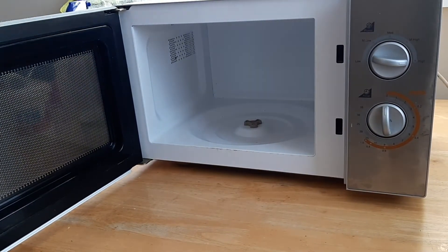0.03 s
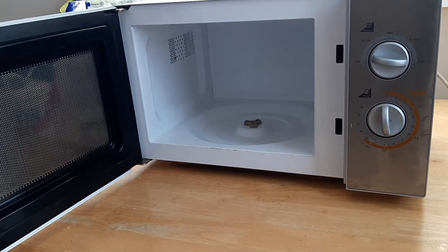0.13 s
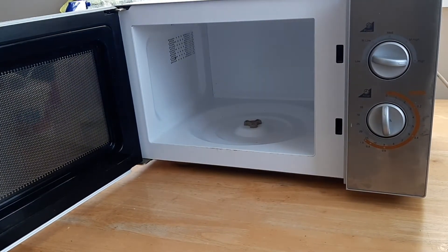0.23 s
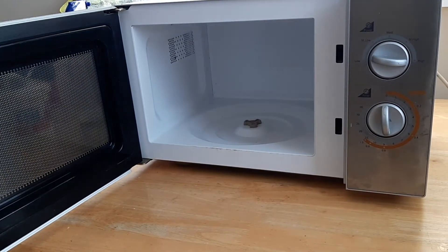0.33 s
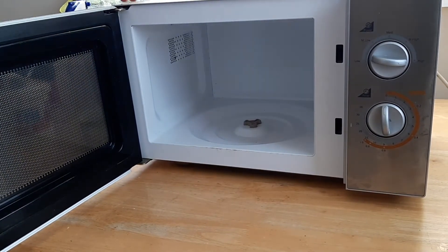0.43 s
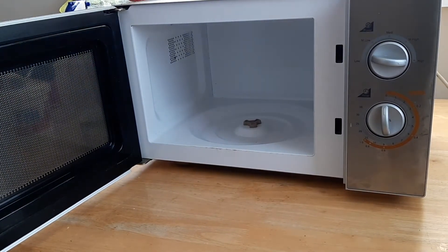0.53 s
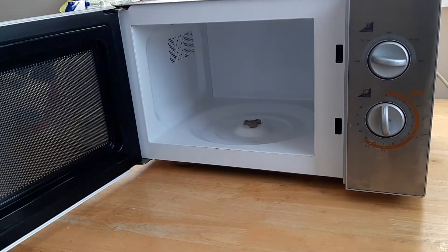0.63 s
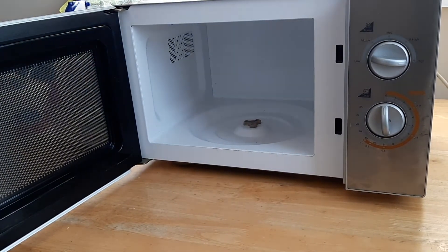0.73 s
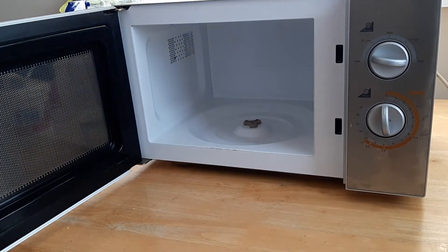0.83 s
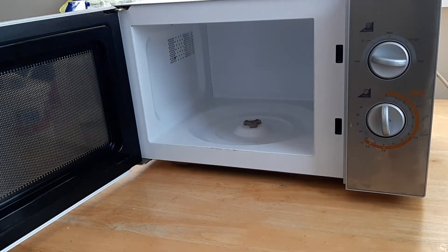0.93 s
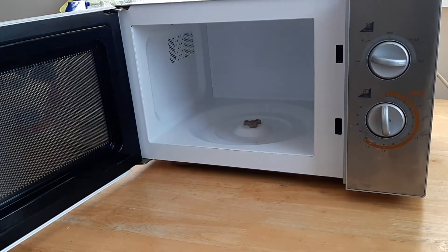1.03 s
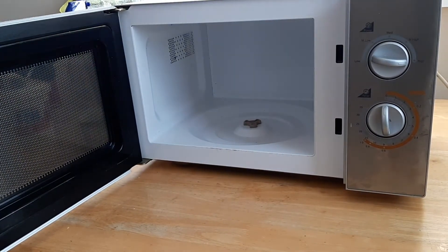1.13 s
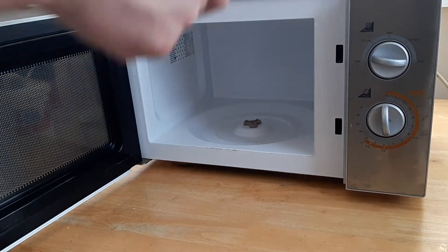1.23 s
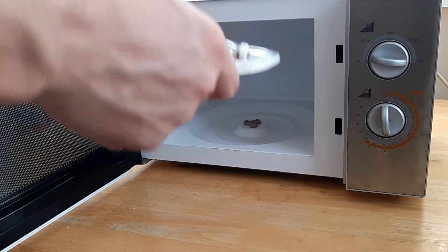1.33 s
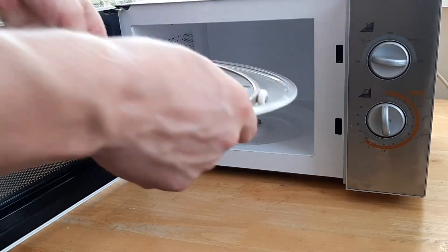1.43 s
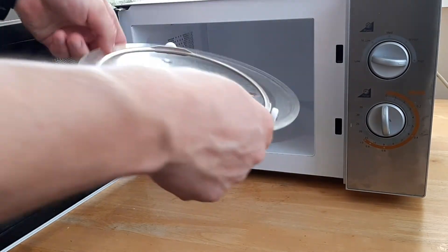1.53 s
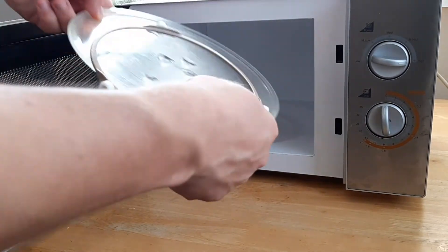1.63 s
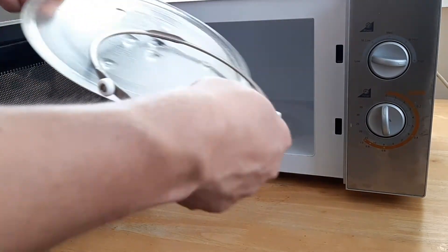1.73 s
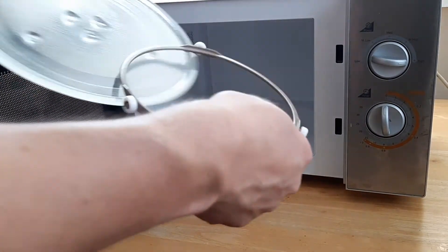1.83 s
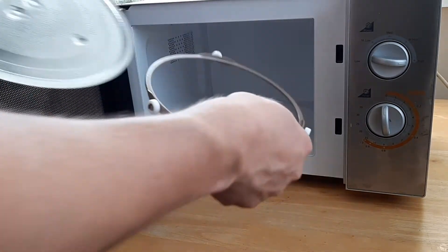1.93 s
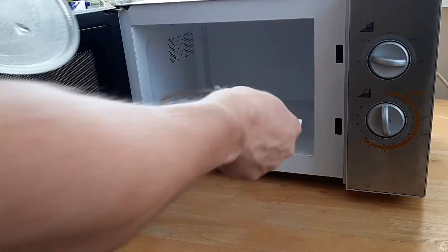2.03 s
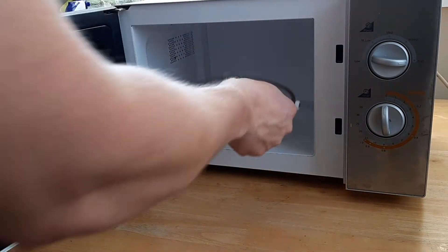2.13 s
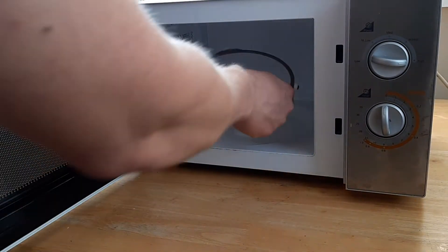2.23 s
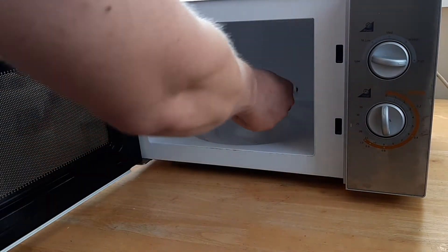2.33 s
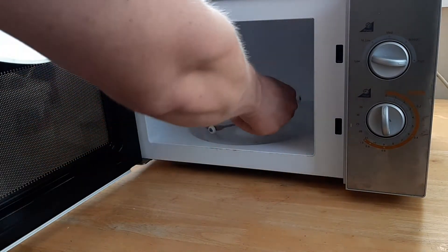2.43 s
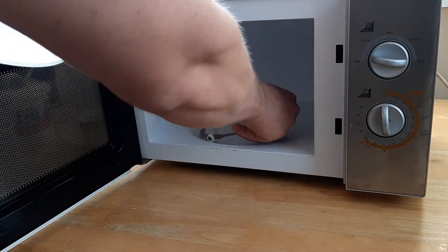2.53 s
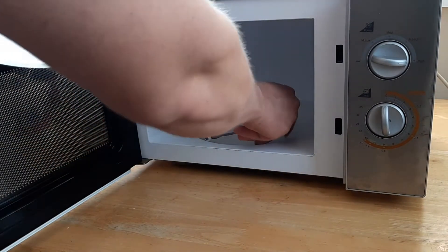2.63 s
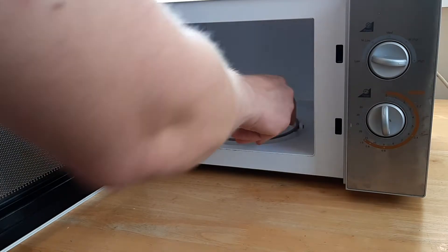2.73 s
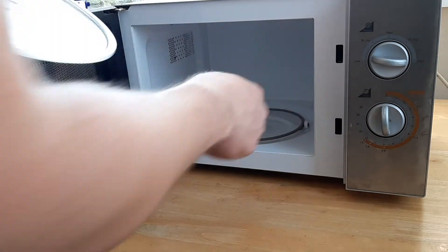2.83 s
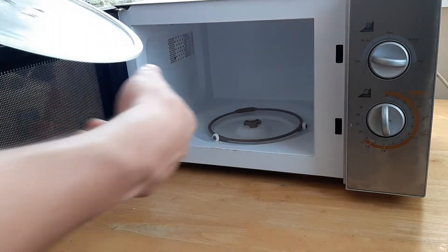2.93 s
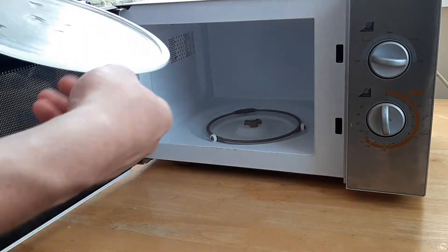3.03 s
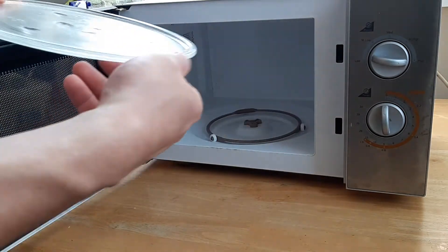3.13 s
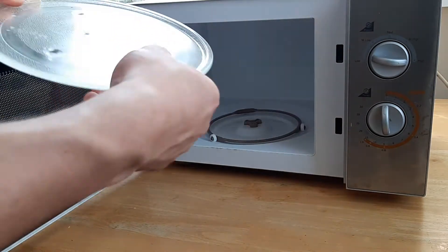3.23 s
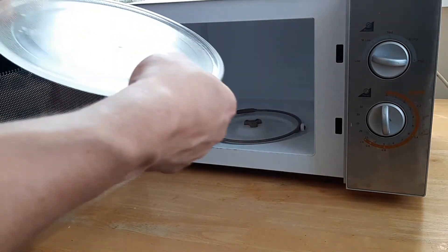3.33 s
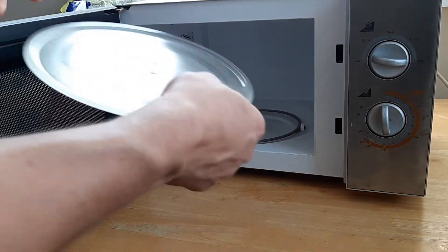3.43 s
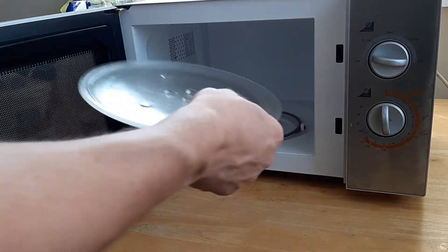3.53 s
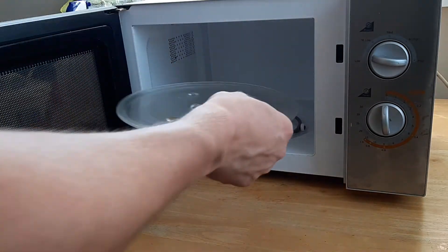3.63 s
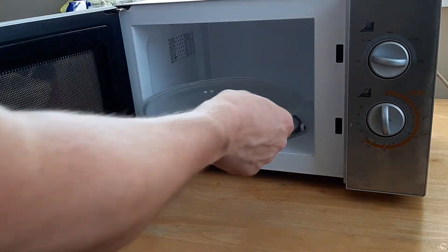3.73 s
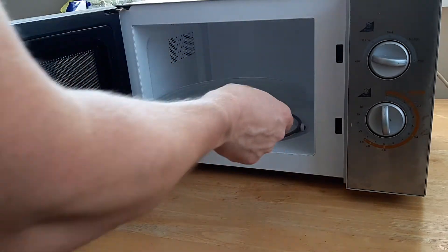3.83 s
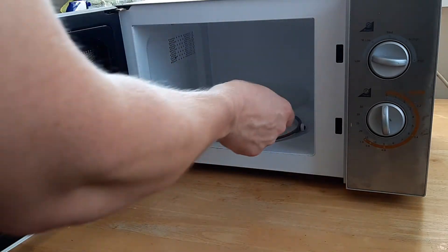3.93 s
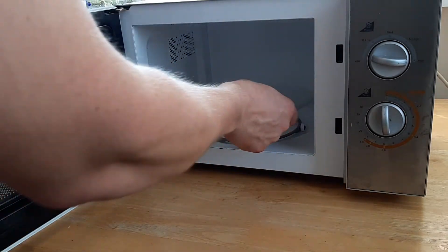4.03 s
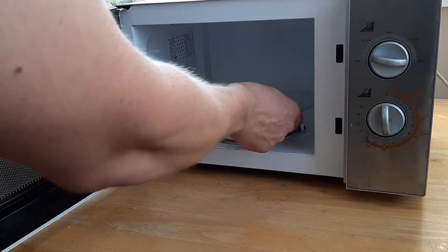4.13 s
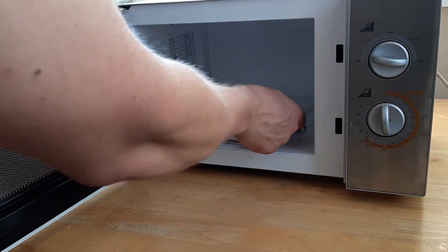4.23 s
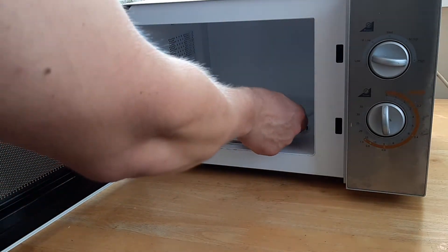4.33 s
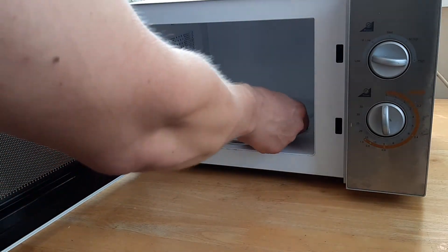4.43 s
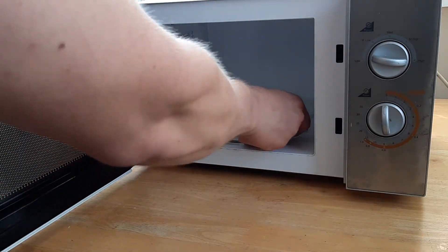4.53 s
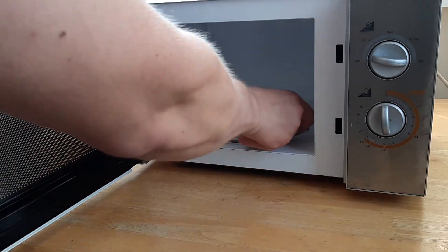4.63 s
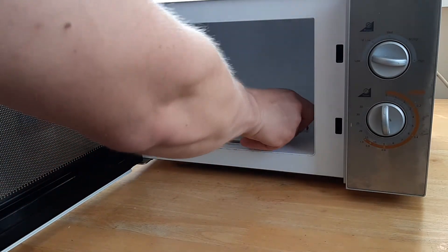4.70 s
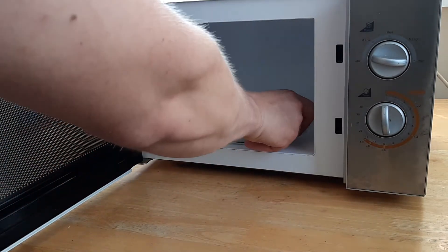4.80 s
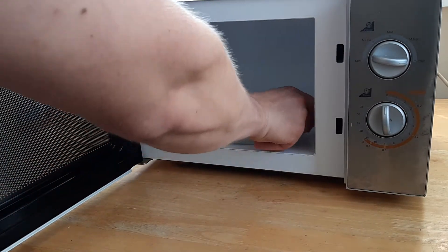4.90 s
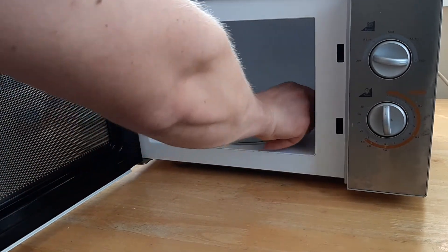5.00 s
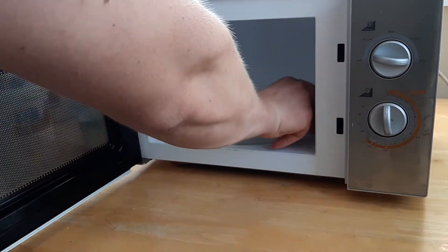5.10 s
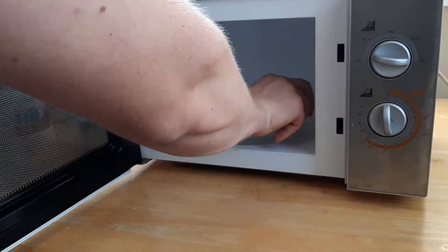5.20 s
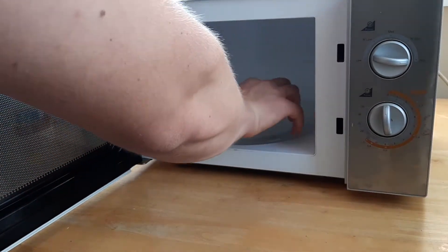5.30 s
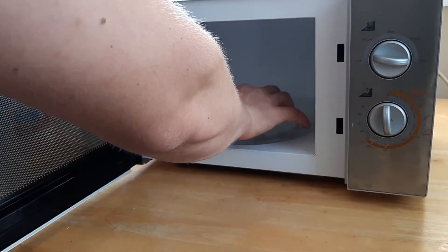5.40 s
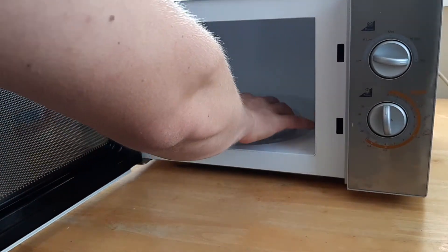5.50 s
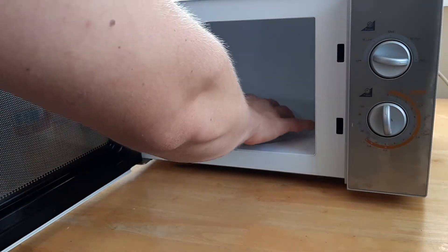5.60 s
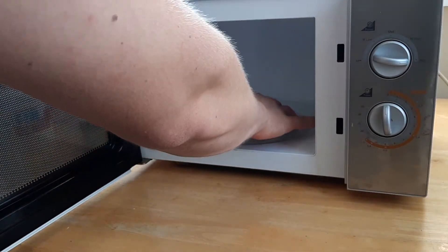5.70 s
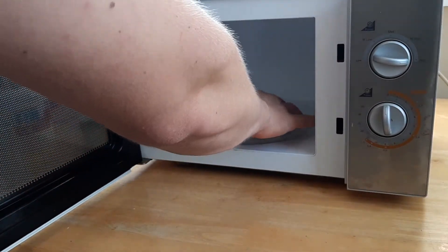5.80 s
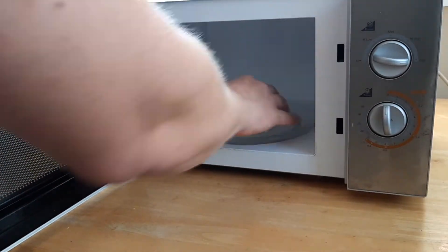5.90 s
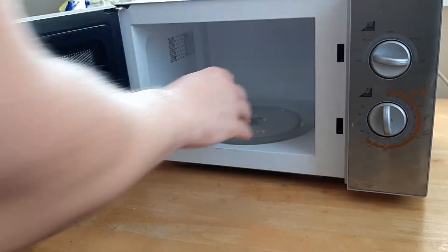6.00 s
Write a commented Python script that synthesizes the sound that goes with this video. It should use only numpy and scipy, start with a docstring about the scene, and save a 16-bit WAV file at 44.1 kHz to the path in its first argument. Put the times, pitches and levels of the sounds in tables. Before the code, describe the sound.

Close, hollow knocks and glassy clinks inside a metal oven cavity, then a loud plastic rattle and heavy plate bumps over faint hum and airy hiss.

```python
"""Glass plate in an open microwave oven

Small kitchen, two-port microphone, oven a little to the left: a glass turntable plate is picked up and clinks
on its roller ring. The plastic ring clatters onto the steel floor; the plate is set down, bumps softly as it is
turned and rocks, and drops onto the coupler with hollow knocks. Each contact rings sine modes and adds a noise
crack and a dense noise tail. Behind lie a rush of air (shaped noise) and a faint hum (wavering sine); gain
control ducks all after loud blows.
"""
import sys
import numpy as np
from scipy import signal
from scipy.fft import rfft, irfft, next_fast_len
from scipy.io import wavfile
from scipy.ndimage import uniform_filter1d, minimum_filter1d

SR = 44100
rng = np.random.default_rng(int(sys.argv[2]) if len(sys.argv) > 2 else 0)


def to_wav(sig):
    """Store sig (one row per channel, or 1-D mono) as 16-bit WAV at the path in sys.argv[1].

    Samples outside -1..1 are clipped; the rate is SR.
    """
    pcm = np.clip(np.atleast_2d(sig), -1, 1) * 32767
    pcm = np.round(pcm).astype(np.int16)
    wavfile.write(sys.argv[1], SR, pcm.T)  # frames by channels


N = 267113

# Background air spectrum: [f/Hz, relative level/dB per Hz]
AIR_SPECTRUM = [(18, -65), (30, -47.5), (134, -5), (165, -17.5), (204, -5.5), (295, -5.5), (426, -6.5),
                (512, -24), (569, -2.5), (616, -15), (801, -8.5), (1810, -20.5), (4300, -20.5), (7870, -44),
                (16000, -56)]
# Hands at the oven, while hum and rumble swell: [start t/s, end t/s, hum level/dB]
HANDLING = [(.48, 1.05, -46.5), (2.348, 2.7, -50.5), (4.45, 6.003, -50.5)]
# Decay of the oven cavity and kitchen: [f/Hz, t60/s]
TAIL_T60 = [(100, 0.53), (400, 0.5), (1500, 0.44), (4000, 0.38), (8000, 0.35), (16000, 0.3)]
# Likeness of the left and right microphone ports: [f/Hz, correlation]
PORT_LIKENESS = [(100, 1), (250, 0.93), (500, 0.76), (1000, 0.23), (2000, 0.12), (4000, 0), (16000, 0.002)]
# Dense, unresolved modes of the sheet steel floor: [f/Hz, relative level/dB per Hz]
FLOOR_CLATTER = [(50, -13), (100, -2.5), (220, 12), (500, 5.5), (1000, 5.5), (1700, -1.5), (2500, 0),
                 (3400, -0.5), (4800, -3.5), (6200, -23), (7500, -46), (11000, -26.5), (16000, -52)]
# Dense, unresolved modes of the plastic roller ring: [f/Hz, relative level/dB per Hz]
ROLLER_CLATTER = [(60, -40), (200, -7), (480, 1), (750, -3.5), (1200, -3.5), (1750, -6.5), (2500, -3),
                  (3300, 2.5), (4600, -0.5), (6000, -12), (7400, -30.5), (9000, -15.5), (16000, -20.5)]
# Dense, unresolved modes of the glass plate: [f/Hz, relative level/dB per Hz]
PLATE_CLATTER = [(100, -40), (400, -8), (1000, -4.5), (2000, -1.5), (3000, 4.5), (4600, 5.5), (6200, -10),
                 (7400, -26), (8600, -18.5), (12000, -15), (16000, -20)]
# Resolved modes of the sheet steel floor: [f/Hz, relative level/dB, t60/s]
FLOOR_MODES = [(133.7, -10.5, 0.99), (157.8, -3, 0.33), (203.5, -12.5, 0.73), (216.3, 0.5, 0.51),
               (244, -15.5, 1), (281.4, -4, 0.7), (320, 2, 0.39), (398, -1.5, 0.23), (446.1, 1, 0.46),
               (499, -21, 0.26), (512, -21, 0.38), (561, -10, 0.58), (701, -3, 0.17), (962, -8, 0.28),
               (1207, -5, 0.1), (1810, -15.5, 0.14), (2030, -12.5, 0.5), (2250, -10.5, 0.24),
               (3145, -9.5, 0.4), (3380, -20, 0.26), (3720, -17, 0.22), (4230, -30, 0.28),
               (4300, -16, 0.16), (5650, -2.5, 0.12)]
# Resolved modes of the plastic roller ring: [f/Hz, relative level/dB, t60/s]
ROLLER_MODES = [(162.3, -14.5, 0.55), (314.3, -12, 0.6), (441.4, -14.5, 0.27), (560, -7.5, 0.43),
                (940, -3, 0.26), (999, -11.5, 0.42), (1195, -3.5, 0.28), (1406, 5.5, 0.11),
                (2026, 1.5, 0.22), (2243, -0.5, 0.43), (2820, -5.5, 0.19), (2960, 7, 0.039),
                (3357, 4, 0.14), (3470, -6, 0.18), (3630, 5, .22), (3840, 3, .2), (3880, -8, 0.24),
                (4670, -6, 0.15), (5000, 0.5, 0.16), (6050, 1, .2)]
# Resolved modes of the glass plate: [f/Hz, relative level/dB, t60/s]
PLATE_MODES = [(725, -7.5, 0.092), (1569, -3, 0.29), (1571, -4, 0.082), (2210, -30.5, 1), (2743, -1, 0.12),
               (2906, -4, 0.2), (3550, -21, 0.46), (4114, -5.5, 0.17), (4180, -0.5, 0.075), (4531, -4, .28),
               (4988, -12, .19), (5690, -12, .24), (4980, -15, .35), (6540, -13.5, 0.21),
               (6620, -22.5, 0.25), (8550, -17.5, 0.24), (10450, -20.5, 0.19), (11360, -23, 0.27)]
# The plate knocks on the sheet steel of the oven; at 4.677 and 4.762 s soft bumps as it is turned and rocks:
# [t/s, level/dB, ring over level/dB, favoured f/Hz, hardness/dB, next touch after t/s, loss per touch/dB]
KNOCKS = [ (.562, -19, -13, 395, -18.5, .058, 6.7), (.666, -13, -15.5, 318, 7, 0.067, 20),
          (4.249, -11.5, -10, 161.2, 1, 0.078, 20.6), (4.677, -57, 11.5, 210, -27, 0.056, 17),
          (4.762, -46.5, -2.5, 207, -28, .078, 3.3), (5.125, -11.5, -7.5, 205.3, -21, .082, 8.14),
          (5.677, -11, -8, 160, 5, 0.072, 29)]
# The wheels of the roller ring land on the oven floor and rebound:
# [t/s, level/dB, ring over level/dB, favoured f/Hz, hardness/dB, next touch after t/s, loss per touch/dB]
ROLLER_DROPS = [ (2.405, -2.5, -12, 3330, 1.5, .101, 6.5), (2.421, -7.5, -20.5, 1040, 1, 0.095, 7.5),
                (2.708, -1.5, -15, 2040, -3, .060, 7)]
# The glass plate is touched; the place of contact favours one mode:
# [t/s, level/dB, ring over level/dB, favoured f/Hz, hardness/dB]
CLINKS = [ (0.519, -45.5, -6, 1565, -20), (.562, -20.5, -14, 2900, 5.5), (.666, -7, -5, 1596, -25),
          (0.682, -12.5, -5, 4620, 8.5), (.696, -10, -3.5, 5690, 9.5), (.724, -7.5, -2, 4086, 6),
          (.820, -16, -2.5, 3526, 4), (1.380, -41, 5.5, 4086, -29), (1.561, -18, -8, 4086, 1),
          (1.731, -31.5, 18.5, 4531, -18), (1.795, -21, 1.5, 5690, 2.5), (1.826, -23.5, 5.5, 3080, -3),
          (3.090, -58, 13, 4130, -36), (5.125, -14, -2.5, 5000, -19)]

# Noise bands: edges and centres f/Hz
EDGES = np.geomspace(35, 17000, 33)
CENTRES = np.sqrt(EDGES[1:] * EDGES[:-1])
TIME = np.arange(N) / SR
AGE = TIME[:int(.75 * SR)]   # t/s since a blow

HUM_HZ, HUM_REST_DB, SWELL_DB_PER_S = 201.6, -60.5, 27
RUMBLE_OVER_HUM_DB, AIR_DB = 10.5, -40.5
KITCHEN_DB = -6
CRACK_T60_S, PORT_LAG_SAMPLES = 0.028, 12
FAVOUR_DB = 11   # extra level of a mode at the favoured frequency
GAP_RATIO = .66   # each gap between touches takes this share of the one before
SOFT_TO_MIDS = 0.52   # dB that the mids gain for each dB less of hardness
# The plate judders down the lobes of the coupler in slips that come ever more slowly
SEAT_S, SLIP_GAP_S, SLIP_SLOWING = 5.592, .0132, 1.125
SLIP_PEAK_S, SLIP_RISE_DB_PER_S, SLIP_FALL_DB_PER_S = 5.609, 1002, 236
SLIP_DB, SLIP_HZ = 0, 448.6
# Gain control and top cut of the recorder
LIMIT_DB, LIMIT_WINDOW_S, HOLD_S, RECOVERY_DB_PER_S = -9, .02, 1, 10
CUTOFF_HZ = 16300


def from_db(db):
    """Decibels to amplitude gain."""
    return 10 ** (np.asarray(db) / 20)


def at_hz(points, hz):
    """Read a table on a log-frequency axis."""
    known_hz, values = np.transpose(points)
    return np.interp(np.log(hz), np.log(known_hz), values)


def fade(t60):
    """Exponential decay by 60 dB in t60 seconds, one row for each t60."""
    return np.exp(-np.log(1000) * AGE / np.reshape(t60, (-1, 1)))


def build_up(hz, cycles):
    """A resonance needs a few cycles to fill, so the lows come late."""
    return 1 - np.exp(-AGE * hz[:, None] / cycles)


def top_share(hz):
    """The part of the spectrum that only a hard contact reaches."""
    return 1 / (1 + (6500 / hz) ** 5)


def add(out, s, sound):
    """Mix a stereo sound in at time s."""
    start = int(s * SR)
    out[:, start:start + sound.shape[1]] += sound[:, :N - start]


def noise_bank():
    """Narrow bands of stereo noise of rms 1, alike in the bass and unrelated in the treble."""
    white = rng.standard_normal((2, 2, N))
    bank = []
    for k, hz in enumerate(CENTRES):
        band_pass = signal.butter(2, EDGES[k:k + 2], "band", fs=SR, output="sos")
        # neighbouring bands draw on separate noise
        mid, side = signal.sosfilt(band_pass, white[k % 2])
        alike = np.clip(at_hz(PORT_LIKENESS, hz), -1, 1)
        band = np.sqrt(1 + alike) * mid + np.sqrt(1 - alike) * side * [[1], [-1]]
        bank.append(band / band.std())
    return np.array(bank, np.float32)


def band_gains(spectrum):
    """Share a total rms of 1 among the bands."""
    gains = from_db(at_hz(spectrum, CENTRES)) * np.sqrt(np.diff(EDGES))
    return gains / np.linalg.norm(gains)


def burst(bank, envelopes):
    """A randomly chosen stretch of noise with one envelope a band."""
    start = rng.integers(len(AGE), N - len(AGE))
    stretch = bank[:, :, start:start + len(AGE)]
    return np.einsum("bct,bt->ct", stretch, envelopes.astype(np.float32))


def background(bank, waver=0.54):
    """An even rush of air, and a wavering hum that swells together with a low rumble."""
    swells = [db - SWELL_DB_PER_S * np.abs(TIME - np.clip(TIME, start, end))
              for start, end, db in HANDLING]
    hum_db = np.maximum(HUM_REST_DB, np.max(swells, axis=0))

    low_share = 1 / (1 + (CENTRES / 170) ** 4)
    gains = band_gains(AIR_SPECTRUM)
    rumble = np.tensordot((low_share * gains).astype(np.float32), bank, 1)
    air = np.tensordot(((1 - low_share) * gains).astype(np.float32), bank, 1)

    knots = np.linspace(0, TIME[-1], 60)
    wander = waver * rng.standard_normal((2, len(knots)))
    level_waver, phase_waver = (np.interp(TIME, knots, row) for row in wander)
    hum = np.sqrt(2) * (1 + level_waver) * np.sin(2 * np.pi * HUM_HZ * TIME + phase_waver)
    return from_db(AIR_DB) * air + from_db(hum_db) * (hum + from_db(RUMBLE_OVER_HUM_DB) * rumble)


def kitchen(bank, sound, sustain=0.99, bass_hz=600):
    """Diffuse reflections from the oven walls and the room; the bass arrives mostly direct."""
    decay = fade(sustain * at_hz(TAIL_T60, CENTRES))
    echo = burst(bank, np.sqrt(np.diff(EDGES))[:, None] * decay)
    echo = echo / np.linalg.norm(echo, axis=1, keepdims=True)
    echo = signal.sosfilt(signal.butter(1, bass_hz, "high", fs=SR, output="sos"), echo)
    return from_db(KITCHEN_DB) * signal.fftconvolve(sound, echo, axes=1)[:, :N]


def ripple(sound, depth_db):
    """Echoes within a few ms inside the steel box carve close peaks and valleys into the mids and highs."""
    echoes = rng.standard_normal(len(AGE)) * fade(.03)[0] * (AGE > .0015)
    echoes /= np.linalg.norm(echoes)
    echoes = signal.sosfilt(signal.butter(2, 1100, "high", fs=SR, output="sos"), echoes)
    size = next_fast_len(N + len(AGE))
    # the exponential adds echoes of echoes, all causal
    response = np.exp(np.log(from_db(depth_db)) * np.sqrt(2) * rfft(echoes, size))
    response /= np.sqrt(np.mean(np.abs(response) ** 2))
    return irfft(rfft(sound, size) * response, size)[:, :N]


def clatter(bank, blows, spectrum, cycles):
    """A short crack comes straight to the microphone, left port first; dense modes die away in the cavity."""
    middle = np.exp(-np.log(CENTRES / 1450) ** 2 / 0.7)
    onset = band_gains(spectrum)[:, None] * build_up(CENTRES, cycles)
    crack = onset * fade(CRACK_T60_S)
    tail = onset * fade(at_hz(TAIL_T60, CENTRES))
    out = np.zeros((2, N))
    for s, _, _, clatter_db, crack_db, mid_db, top_db in blows:
        colour_db = clatter_db + mid_db * middle + top_db * top_share(CENTRES)
        colour = from_db(colour_db)[:, None]
        direct = from_db(crack_db) * burst(bank, colour * crack)[0]
        both_ports = [direct, np.roll(direct, PORT_LAG_SAMPLES)]
        add(out, s, burst(bank, colour * tail) + both_ports)
    return ripple(out, depth_db=3.6)


def ringing(blows, modes, cycles, scatter_db):
    """Each blow starts all modes of an object from rest, most of all those that move at the place of contact."""
    hz, mode_db, t60 = np.transpose(modes)
    waves = fade(t60) * build_up(hz, cycles) * np.exp(2j * np.pi * hz[:, None] * AGE)
    # short waves reach the two ports out of step
    apart = np.arccos(np.clip(at_hz(PORT_LIKENESS, hz), -1, 1)) / 2
    # each mode radiates from its own part of the surface
    turn = np.pi * np.arange(len(hz)) ** 2 / len(hz)
    ports = np.exp(1j * (turn + apart * [[1], [-1]]))
    out = np.zeros((2, N))
    for s, ring_db, favoured_hz, _, _, _, top_db in blows:
        favour = np.exp(-(np.log(hz / favoured_hz) / .04) ** 2)
        colour_db = FAVOUR_DB * favour + top_db * top_share(hz)
        scatter = scatter_db * rng.standard_normal(len(hz))
        strength = from_db(ring_db + mode_db + colour_db + scatter)
        add(out, s, ((strength * ports) @ waves).imag)
    return out


def blow(s, db, ring_db, hz, hardness_db, crack_db, body_db):
    """One contact: a hard one is bright, a soft one fills the mids."""
    mid_db = body_db - SOFT_TO_MIDS * hardness_db
    # t/s, ring level/dB, favoured f/Hz, clatter level/dB, crack/dB, mids/dB, top/dB
    return s, db + ring_db, hz, db, crack_db, mid_db, hardness_db


def repeated_touches(rows, crack_db, body_db, count):
    """Each row gives a run of touches that follow ever sooner and weaker."""
    blows = []
    for s, db, ring_db, hz, hardness_db, gap_s, loss_db in rows:
        for k in range(count):
            blows.append(blow(s, db - k * loss_db, ring_db, hz, hardness_db, crack_db, body_db))
            s += gap_s * GAP_RATIO ** k
    return blows


def seating_slips(count=5):
    """Slips down the coupler: ever wider gaps, a level that swells and fades; gives (t/s, level/dB)."""
    gaps = SLIP_GAP_S * SLIP_SLOWING ** np.arange(count - 1)
    times = SEAT_S + np.append(0, np.cumsum(gaps))
    late = times - SLIP_PEAK_S
    levels = SLIP_DB + np.minimum(SLIP_RISE_DB_PER_S * late, -SLIP_FALL_DB_PER_S * late)
    return list(zip(times, levels))


def oven_floor(bank, slips):
    """Sheet steel rings and clatters under knocks and soft bumps, and thumps at each slip of the plate."""
    thumps = [blow(s, db, ring_db=-16.5, hz=SLIP_HZ, hardness_db=-2.5, crack_db=-5.5, body_db=-13)
              for s, db in slips]
    blows = repeated_touches(KNOCKS, crack_db=5.5, body_db=-2.5, count=3) + thumps
    rings = ringing(blows, FLOOR_MODES, cycles=0.6, scatter_db=4.5)
    return rings, clatter(bank, blows, FLOOR_CLATTER, cycles=1.6)


def roller_ring(bank):
    """The plastic ring lands on its wheels and rebounds, exciting its own modes."""
    blows = repeated_touches(ROLLER_DROPS, crack_db=6.5, body_db=0.0, count=3)
    rings = ringing(blows, ROLLER_MODES, cycles=1.8, scatter_db=4.5)
    return rings, clatter(bank, blows, ROLLER_CLATTER, cycles=2.9)


def glass_plate(bank, slips):
    """The glass rings most near the mode favoured by each touch; all but the first two slips rasp it."""
    clinks = [blow(*row, crack_db=1.5, body_db=-4) for row in CLINKS]
    # same columns as blow() returns
    rasps = [(s, db - 25, SLIP_HZ, db + 7, -8, -39, -23.5) for s, db in slips[2:]]
    blows = clinks + rasps
    rings = ringing(blows, PLATE_MODES, cycles=0.95, scatter_db=-2.0)
    return rings, clatter(bank, blows, PLATE_CLATTER, cycles=0.6)


def scene():
    """Sheet steel, plastic and glass sound in the open oven, a little to the left, over the background."""
    bank = noise_bank()
    slips = seating_slips()
    floor_rings, floor_clatter = oven_floor(bank, slips)
    roller_rings, roller_clatter = roller_ring(bank)
    plate_rings, plate_clatter = glass_plate(bank, slips)
    rings = floor_rings + roller_rings + plate_rings
    clatters = floor_clatter + roller_clatter + plate_clatter
    oven = rings + kitchen(bank, rings) + clatters
    return background(bank) + oven * from_db([[.4], [-.4]])


def gain_control(sound):
    """A loud blow turns the gain down; it is held, then creeps back, so the background sinks and recovers."""
    power = uniform_filter1d(np.mean(sound ** 2, axis=0), int(LIMIT_WINDOW_S * SR))
    gain_db = np.minimum(0, LIMIT_DB - 10 * np.log10(np.maximum(power, 1e-12)))
    half = int(HOLD_S * SR / 2)
    # the origin shifts the window to look back only
    held_db = minimum_filter1d(gain_db, 2 * half + 1, origin=half, mode="nearest")
    creep_db = RECOVERY_DB_PER_S * TIME
    return sound * from_db(np.minimum.accumulate(held_db - creep_db) + creep_db)


def record(dry):
    """The gain control acts, the highest peaks are rounded and the top is cut."""
    levelled = gain_control(dry)
    rounded = levelled / (1 + (levelled / .95) ** 4) ** .25
    top_cut = signal.ellip(10, .1, 80, CUTOFF_HZ, fs=SR, output="sos")
    return signal.sosfilt(top_cut, rounded)


dry = scene()
out = record(dry)
to_wav(out)
```